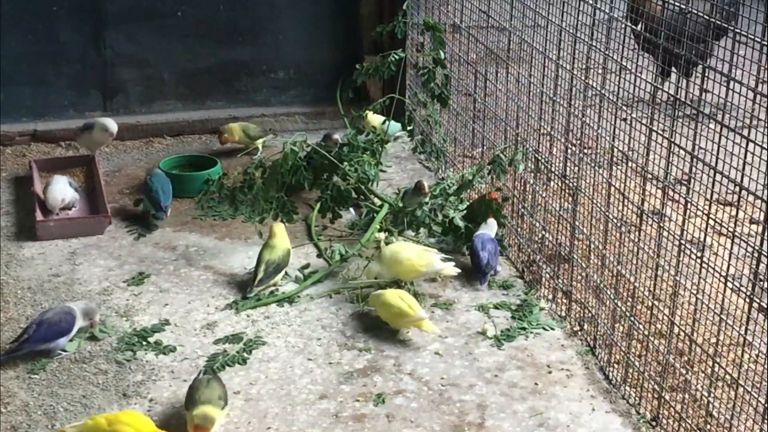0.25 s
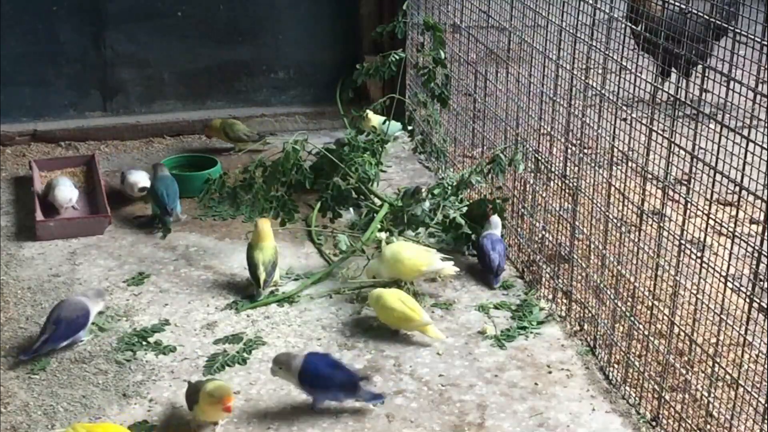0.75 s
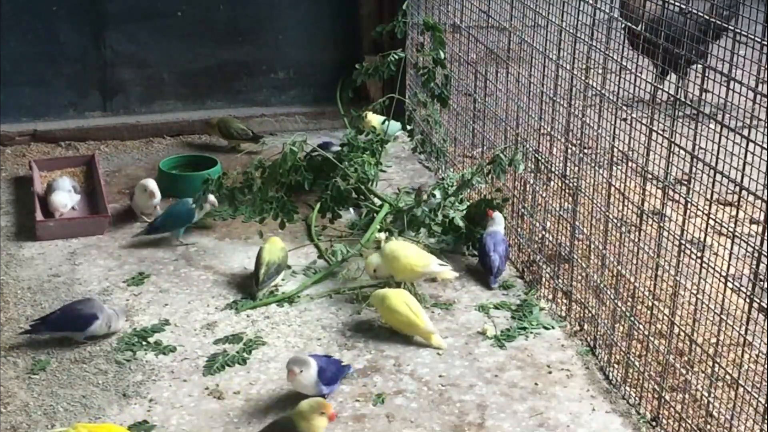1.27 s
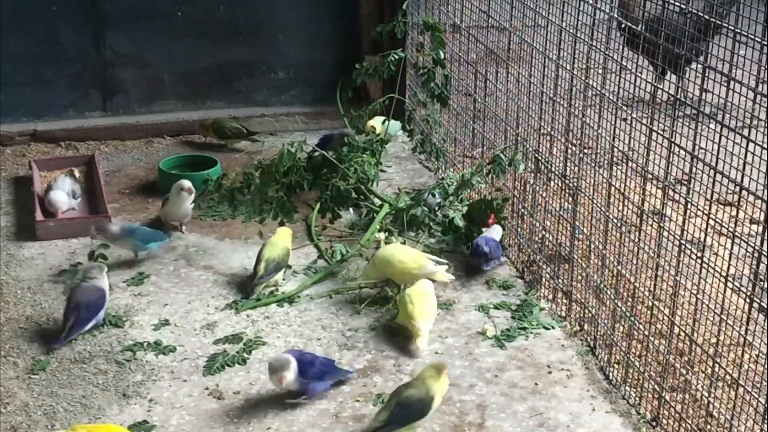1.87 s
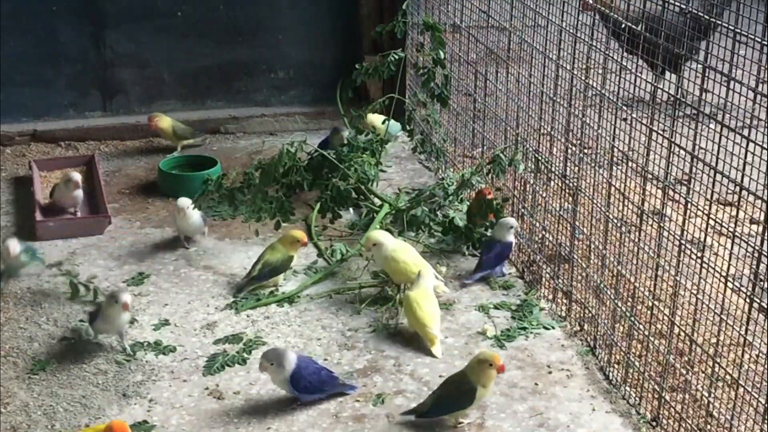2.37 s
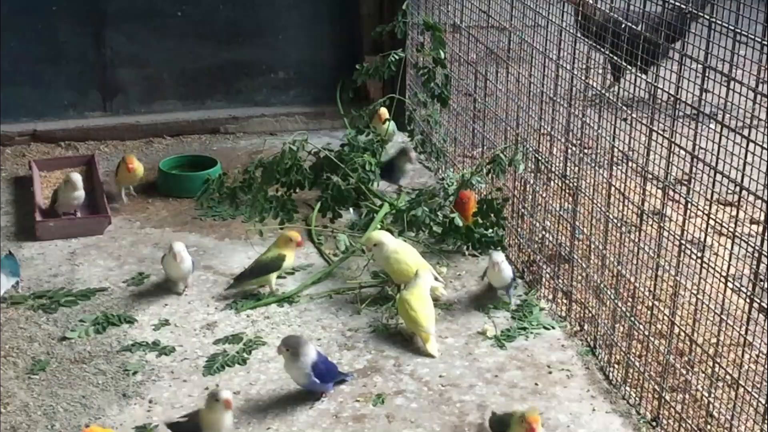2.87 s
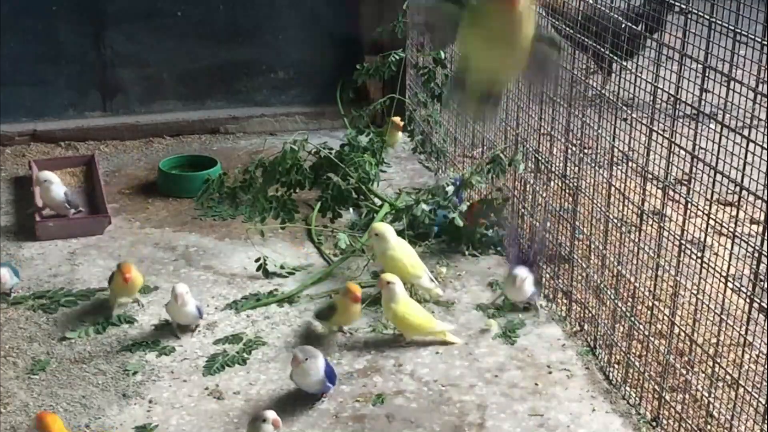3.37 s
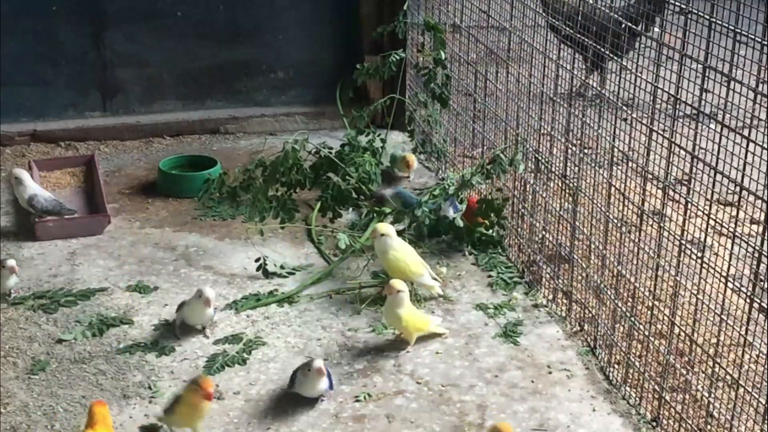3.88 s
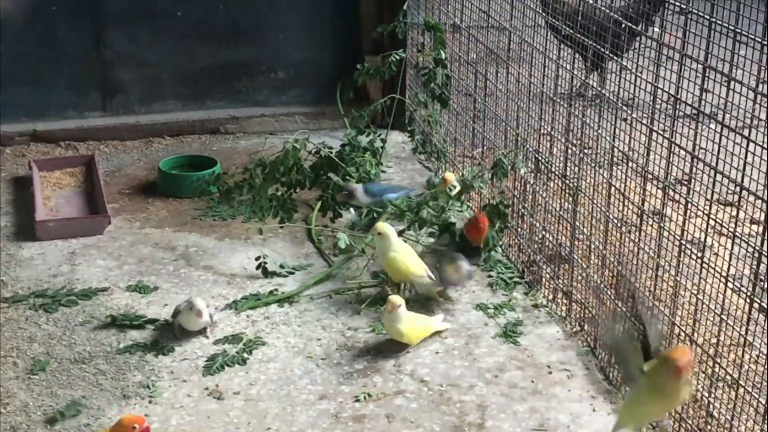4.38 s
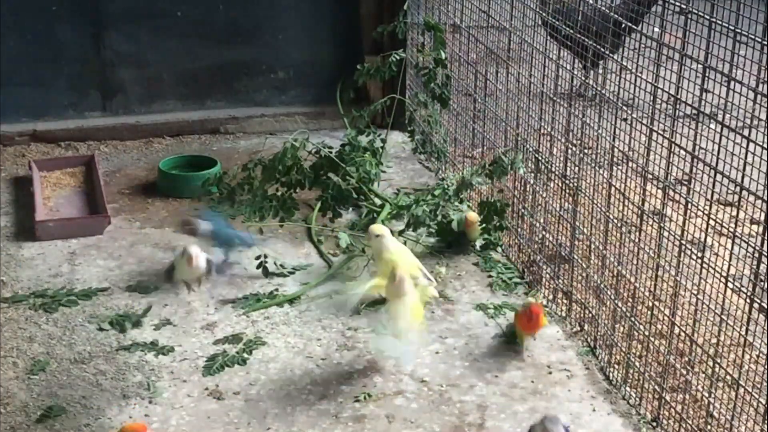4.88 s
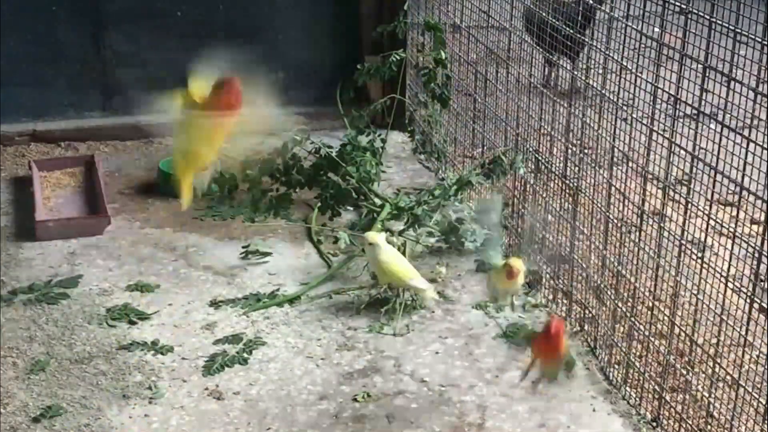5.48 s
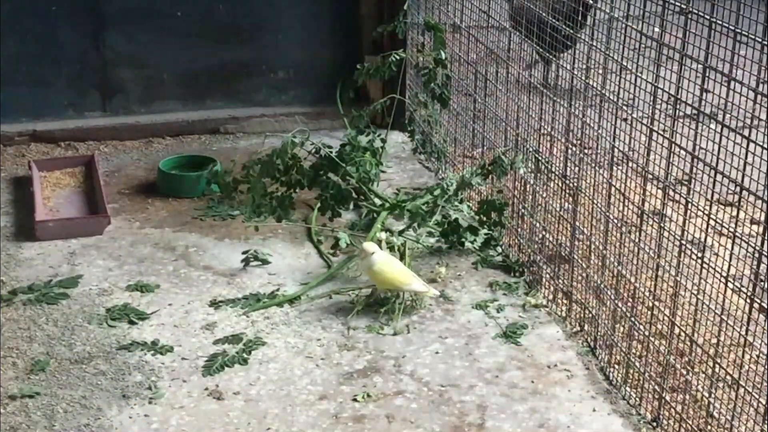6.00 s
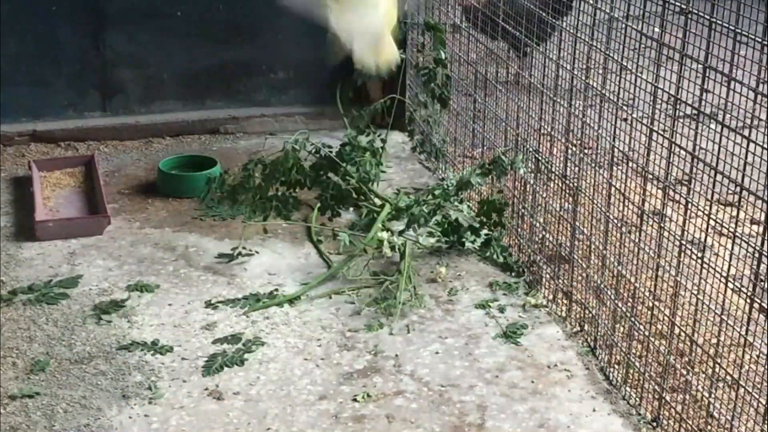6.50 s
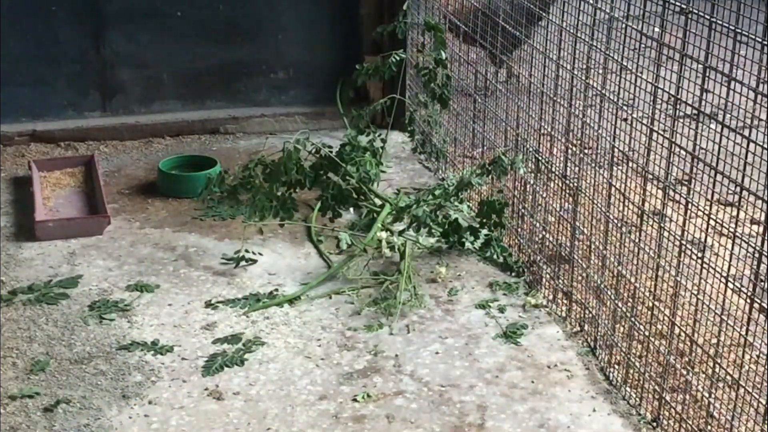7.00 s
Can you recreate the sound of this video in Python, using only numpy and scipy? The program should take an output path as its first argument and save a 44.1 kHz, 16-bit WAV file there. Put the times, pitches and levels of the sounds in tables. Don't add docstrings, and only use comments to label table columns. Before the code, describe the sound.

Small parrots squawk sharply, then wings flutter, clap and whoosh past in bursts over wooden knocks, with piercing chirps inside a short-echoing aviary.

```python
import sys
import numpy as np
from scipy import signal
from scipy.fft import rfft, irfft, next_fast_len
from scipy.io import wavfile
from scipy.ndimage import uniform_filter1d

SR = 44100
rng = np.random.default_rng(int(sys.argv[2]) if len(sys.argv) > 2 else 0)


def pcm_store(signal):
    levels = np.round(np.clip(np.atleast_2d(signal), -1, 1) * 32767)
    wavfile.write(sys.argv[1], SR, levels.astype(np.int16).T)


def how_loud(loudness_db):
    steps = np.asarray(loudness_db, float) / 20
    return 10 ** steps


N = 319725
EDGES_HZ = 25 * 2 ** np.arange(0, 9.4, 1 / 3)
MIDS_HZ = np.sqrt(EDGES_HZ[1:] * EDGES_HZ[:-1])


def rms_one(x):
    return x / np.sqrt(np.mean(x ** 2) + 1e-20)


def evened(x):
    return x / np.sqrt(uniform_filter1d(x ** 2, size=SR // 8) + 1e-20)


def at_hz(points, hz):
    points_hz, points_db = np.transpose(points)
    return np.interp(np.log(hz), np.log(points_hz), points_db)


def filled(slow):
    return np.interp(np.arange(N) / 40, np.arange(len(slow)), slow)


def drift(rate_hz, coarse=False):
    r = np.exp(-80 * np.pi * rate_hz / SR)
    wander = signal.lfilter([1], [1, -2 * r, r * r], rng.standard_normal(N // 40 + 1002))
    slow = rms_one(wander[1000:])
    return slow if coarse else filled(slow)


def noise_bank():
    white = rng.standard_normal((2, N))
    bands = []
    for k, edges in enumerate(zip(EDGES_HZ, EDGES_HZ[1:])):
        band = signal.butter(2, edges, "band", fs=SR, output="sos")
        bands.append(signal.sosfilt(band, white[k % 2]))
    return np.array(bands)


def resonance(x, hz, width_hz):
    r = np.exp(-np.pi * width_hz / SR)
    top = np.array([1, 0, -1]) * (1 - r * r) / 2
    return signal.lfilter(top, [1, -2 * r * np.cos(2 * np.pi * hz / SR), r * r], x)


# pitch_hz, width_hz, level_db
WOOD_NOTES = [(280, 68, 2.5), (383.4, 51.7, 6.5), (420, 39, -0.5), (615.7, 35, 4), (694.6, 44, 2.5),
              (855, 40, 3.5), (974, 94, -7.5), (1090, 18, 9), (1102, 56, -4), (1500, 29, -10.5),
              (1700, 44, -19)]


def woodwork(x):
    return sum((-1) ** k * how_loud(db) * resonance(x, hz, width) for k, (hz, width, db) in enumerate(WOOD_NOTES))


# time_s, wing_effort_db, nearness_db
FLOCK = [(0, -8.5, 9.5), (.2, -13.5, 0), (1, -15, -3.5), (1.9, -13, -6.5), (2.1, 4.5, -15),
         (2.35, -20.5, 3), (2.648, 6, -12), (3, -10, -2), (3.3, 6.5, 0), (3.85, 3, 2.5), (4.26, 5, 4),
         (4.64, 5, 2.5), (5.05, 6, 0.5), (5.7, 4, 6), (6, 3, 2.5), (6.7, -4.5, 3), (6.9, 4.5, 4.5),
         (7.25, -9, 2)]


def flock(level_db, effort_share, near_share):
    s, effort_db, near_db = np.transpose(FLOCK)
    return np.interp(np.arange(N) / SR, s, level_db + effort_share * effort_db + near_share * near_db)


# peak_s, deep_gust_db, hollow_boom_db, length_s
PASSES = [(0.087, -45, -37.5, 0.11), (0.897, -49, -57.5, 1.24), (0.455, -57, -44, 0.2),
          (1.521, -46, -49, 0.83), (2.013, -58.5, -36.5, 0.25), (2.26, -41.5, -33, 0.39),
          (2.668, -39.5, -40.5, 1.1), (3.288, -35.5, -41, 0.36), (3.657, -32.5, -30.5, 0.19),
          (3.864, -31, -49, 0.29), (4.045, -29, -34, 0.31), (4.267, -46, -21, 0.2),
          (4.417, -31.5, -40.5, 0.31), (5.005, -29.5, -37.5, 0.64), (5.764, -27, -35.5, 0.32),
          (6.403, -37.5, -44.5, 0.47), (6.976, -37.5, -40.5, 0.88)]


def passing(flock_db, column):
    rise_share, depth_db = 0.47, 23.5
    t = np.arange(0, N, 64) / SR
    power = how_loud(2 * flock_db[::64])
    for row in PASSES:
        lead = (row[0] - t) / row[3]
        away = np.maximum(lead / rise_share, -lead / (1 - rise_share))
        power = power + how_loud(2 * (row[column] - depth_db * away ** 2))
    return np.interp(np.arange(N) / SR, t, 10 * np.log10(power))


def turbulence(bank, colour, patchy_db, beat_db):
    wingbeat_hz = 16 * (1 + .3 * drift(3.115, True))
    beat = np.sin(2 * np.pi * np.cumsum(wingbeat_hz) * 40 / SR) * drift(3.8, True)
    air = np.zeros(N)
    for band, hz in zip(bank, MIDS_HZ):
        if colour[0][0] < hz < colour[-1][0]:
            level_db = at_hz(colour, hz) + patchy_db * drift(18.6, True) + beat_db * beat
            air += filled(how_loud(level_db)) * band
    return rms_one(air)


# pitch_hz, level_db (per Hz)
DOWNWASH_COLOUR = [(15, -39), (25, -7), (54, 3), (105, 3.5), (140, -8), (230, -120)]
# pitch_hz, width_hz, level_db
PEN_BOOM = [(118, 14, -7), (144, 11, 0), (168, 20, -9)]


def downwash(bank):
    gust_db = passing(flock(level_db=-42, effort_share=0.37, near_share=0.97), column=1)
    boom_db = passing(flock(level_db=-52.5, effort_share=0.54, near_share=0.073), column=2)
    gust = turbulence(bank, DOWNWASH_COLOUR, patchy_db=-2.0, beat_db=1.0)
    push = rng.standard_normal(N)
    hum = rms_one(resonance(resonance(push, 90, 40), 90, 16))
    boom = np.zeros(N)
    for hz, width, db in PEN_BOOM:
        boom += how_loud(db) * rms_one(resonance(resonance(push, hz, 3 * width), hz, width))
    return how_loud(gust_db) * evened(gust + how_loud(-43.0 - gust_db) * hum) + how_loud(boom_db) * evened(boom)


# pitch_hz, level_db (per Hz)
DRUMMING_COLOUR = [(120, -28.5), (200, 18), (259, -18.5), (424, 3), (531, 6.5), (652, -5.5), (838, -3),
                   (1130, -13.5), (1700, -26), (2210, -49), (3740, -120)]


def drumming(bank):
    drum = turbulence(bank, DRUMMING_COLOUR, patchy_db=5.0, beat_db=3.0)
    level_db = flock(level_db=-44, effort_share=0.95, near_share=.01)
    return how_loud(level_db) * rms_one(woodwork(drum) + 0.64 * drum)


# pitch_hz, level_db (per Hz)
RUSH_COLOUR = [(760, -11), (1300, -3.5), (1510, -8), (3550, -15), (5150, -35), (6000, -32), (7800, -53.5),
               (13200, -120)]


def rush(bank):
    level_db = flock(level_db=-49.5, effort_share=0.96, near_share=0.3)
    return how_loud(level_db) * turbulence(bank, RUSH_COLOUR, patchy_db=3.0, beat_db=1.8)


# pitch_hz, level_db (per Hz)
HISS_COLOUR = [(2940, -17.5), (5000, -3), (6390, -8.5), (7810, -7.5), (10300, -7), (11200, -10),
               (15700, -9.5)]


def hiss(bank):
    level_db = flock(level_db=-58, effort_share=0.46, near_share=0.92)
    return how_loud(level_db) * turbulence(bank, HISS_COLOUR, patchy_db=2.2, beat_db=2.2)


# start_s, length_s, peak_db, first_pitch_hz, last_pitch_hz
SQUAWKS = [(-.01, .03, -21, 6800, 6100), (-.01, .03, -21, 3150, 2900), (-.01, .029, -23, 2400, 1940),
           (.018, .028, -16, 4750, 4600), (.071, .009, -16, 3860, 3850), (.078, .045, -26, 2600, 2250),
           (.084, .019, -11.5, 4060, 3950), (.103, .008, -15, 3900, 3700), (.11, .025, -23, 4700, 4500),
           (.112, .024, -19, 3350, 3050), (.112, .03, -25, 1700, 1500), (.14, .03, -32, 3900, 3700),
           (.16, .035, -31, 1750, 1850), (.171, .017, -16, 3164, 3115), (.181, .035, -27, 2730, 2730),
           (.17, .03, -30, 4300, 4400), (.605, .02, -48, 2336, 2270), (1.41, .07, -57, 1720, 1700),
           (1.43, .08, -57, 1560, 1540), (2.192, .03, -44, 3300, 3300), (2.192, .025, -50, 4800, 4800),
           (2.196, .13, -56, 11900, 11300), (2.313, .051, -57, 10900, 10500), (2.33, .04, -60, 9600, 9500),
           (4.803, .06, -34, 2317, 2374), (4.897, .02, -25, 2300, 2250), (.157, .005, -24, 3800, 3800),
           (3.745, .025, -40, 2800, 2750), (5.478, .015, -40, 3350, 3300), (5.508, .02, -37, 3350, 3300),
           (5.515, .045, -37, 4340, 4470), (7.027, .014, -40, 3300, 3250), (7.092, .045, -43, 3300, 3250),
           (7.095, .015, -47, 5100, 5100)]
# time_s, pitch_hz, level_db
OPENING = (-15, -25, .45, [(0, 4400, -15), (.006, 4700, -9), (.011, 5100, -16), (.016, 4600, -13),
           (.021, 4400, -6), (.025, 4100, -15), (.032, 3850, -16), (.042, 3850, -23)])
RISING = (8, 2, .25, [(5.735, 2080, -23), (5.744, 2350, -15), (5.7485, 2480, -29), (5.752, 2600, -16),
          (5.767, 2720, -16), (5.772, 2700, -28), (5.786, 2720, -24), (5.79, 2700, -38), (5.84, 2650, -42)])
SCREECH = (-30, -6, .95, [(5.771, 6500, -21), (5.777, 6500, -14), (5.785, 6300, -17), (5.795, 6150, -11),
           (5.8, 6150, -20), (5.815, 6150, -22), (5.84, 6100, -32)])
UPSWEEP = (3, -4, .15, [(6.3805, 2980, -28), (6.384, 3080, -17), (6.388, 3200, -15), (6.3895, 3350, -26)])
SQUEAK = (-19, 0, .2,  [(6.3885, 3450, -12), (6.392, 3700, -6), (6.3945, 4000, -15), (6.399, 4600, -1),
          (6.4025, 5100, -14)])
WARBLE = (-36, -6, .1, [(6.407, 6100, -28), (6.411, 6750, -10), (6.415, 6700, -24), (6.419, 6700, 0),
          (6.4215, 6700, -12), (6.424, 6800, 1), (6.4262, 6950, -20), (6.428, 7000, -5),
          (6.4292, 7000, -20), (6.4305, 6400, -1), (6.433, 5250, -7)])
FALLING = (-10, -3, .06, [(6.4325, 5250, -6), (6.4355, 5100, -12), (6.437, 5020, -3), (6.4395, 4950, -11),
           (6.4415, 4800, -1), (6.444, 4500, -7), (6.452, 4350, -11), (6.466, 4330, -20),
           (6.52, 4330, -45)])


def sung_notes():
    peak_share, edge_db = .45, -9
    hoarse = []
    for s, length, db, hz, last_hz in SQUAWKS:
        course = [(s, hz, db + edge_db),
                  (s + peak_share * length, (hz + last_hz) / 2, db),
                  (s + length, last_hz, db + edge_db)]
        hoarse.append((-22, -25, .7, course))
    return hoarse + [OPENING, RISING, SCREECH, UPSWEEP, SQUEAK, WARBLE, FALLING]


# pitch_hz, level_db
BEAK = [(2000, -21), (6500, 3.5), (8000, 5), (9500, -0.5), (11500, 8.5), (13200, 19), (15500, -16)]


def chirps():
    out, shake_level, shake_pitch = np.zeros(N), drift(480), drift(390)
    breath = rms_one(resonance(rng.standard_normal(N), 5070, 5000))
    for tilt_db, upper_db, rough, course in sung_notes():
        s, *columns = np.transpose(course)
        at = np.arange(int(max(s[0], 0) * SR), int(s[-1] * SR))
        hz, db = [np.interp(at / SR, s, column) for column in columns]
        shaken_hz = hz + (200 + 0.023 * hz) * rough * shake_pitch[at]
        phase = 2 * np.pi * np.cumsum(shaken_hz) / SR
        overtones = np.zeros(len(at))
        for k in range(3, 7):
            fall_db = np.minimum(tilt_db, tilt_db / 2 - 21 - 0.52 * (k - 2))
            level = how_loud(fall_db + upper_db + at_hz(BEAK, k * hz))
            overtones += level * np.sin(k * phase) * (k * hz < 16000)
        overtones *= 0.91 + 0.9 * shake_pitch[at + 999] + 0.5 * breath[at]
        second = how_loud(tilt_db + at_hz(BEAK, 2 * hz)) * np.sin(2 * phase)
        tone = np.sin(phase) + second + overtones
        ends = np.clip(np.minimum(at - at[0] + 1, at[-1] - at) / (0.00048 * SR), 0, 1)
        shaken = (1 + rough * np.clip(shake_level[at], -2, 2)) * tone
        out[at] += how_loud(db - 3.5) * ends * (shaken + 0.07 * rough * breath[at])
    return out


def bursts(bank, starts, peak_db, colours_db, t60, rise_s, uneven_db):
    out, t = np.zeros(N), np.arange(SR // 4) / SR
    uneven = uneven_db * rng.standard_normal((len(starts), len(bank)))
    for s, db, colour, decay, own in zip(starts, peak_db, colours_db, t60, uneven):
        i = int(s * SR)
        age = t[:min(N - i, int(max(decay, .02) * 1.5 * SR))]
        heard = colour > -40
        fall = np.clip(decay, .02, 1) * (MIDS_HZ[heard, None] / 3000) ** -.2
        fade = how_loud(db + colour + own)[heard, None] * np.exp(-np.log(1000) * age[::8] / fall)
        fade = np.repeat(fade, 8, axis=1)[:, :len(age)]
        tail = np.einsum("kn,kn->n", fade, bank[heard, i:i + len(age)])
        crack = 1 + 0.55 * np.exp(-age / 0.014)
        out[i:i + len(age)] += (1 - np.exp(-age / rise_s)) * crack * tail
    return out


# start_s, peak_db, centre_hz, fade_s (by 60 dB)
PUFFS = [(0.001, -15.5, 7000, 0.17), (.002, -25, 12950, 0.18), (.165, -30, 2580, 0.19),
         (.09, -31, 7500, .25), (.162, -54, 5000, 0.13), (.39, -50.5, 9000, 0.14), (.45, -48, 10000, 0.096),
         (.585, -49, 10000, 0.11), (.955, -46, 2680, 0.14), (1.455, -51.5, 10000, 0.2),
         (1.8, -50, 2980, 0.16), (2.03, -48, 4200, 0.082), (2.07, -50, 5050, 0.162), (2.25, -44, 6000, 0.1),
         (2.43, -52.5, 9000, .1), (2.625, -45, 2600, 0.12), (2.69, -47, 2370, 0.21),
         (2.955, -43, 1500, 0.12), (3.28, -15.5, 930, 0.23), (3.443, -37, 7000, 0.11),
         (3.488, -33.5, 7150, 0.15), (3.82, -37, 7040, .15), (4.195, -43, 8500, 0.081),
         (4.42, -35.5, 9700, 0.12), (4.455, -43.5, 9000, 0.53), (5.165, -37, 7000, 0.11),
         (5.4, -37, 4800, 0.24), (5.675, -38, 7000, 0.13), (5.985, -43, 10000, 0.084),
         (6.108, -54, 7000, .12), (5.94, -46, 9000, 0.075), (6.386, -25.5, 12500, 0.23),
         (6.39, -22, 8000, .13), (6.42, -40, 13930, .2), (3.05, -36, 2140, 0.71), (5.74, -24, 8000, 0.23),
         (5.82, -26, 4400, 0.35)]


def puffs(bank):
    s, db, hz, t60 = np.transpose(PUFFS)
    colours = [-20.5 * np.log2(MIDS_HZ / centre) ** 2 for centre in hz]
    return bursts(bank, s, db + 3.5, colours, t60, rise_s=.012, uneven_db=1.5)


def quills(x):
    pitches_hz = np.geomspace(1400, 9000, num=30) * (1 + 0.0464 * rng.standard_normal(size=30))
    return sum((-1) ** k * resonance(x, hz, 0.0063 * hz) for k, hz in enumerate(pitches_hz))


# start_s, peak_db, top_db (relative), focus_hz
CLAPS = [(0.417, -33, -32, 2340), (0.523, -47.5, 4, 1770), (0.667, -58, 15, 2480),
         (1.906, -39.5, -13, 3480), (1.949, -22.5, -31, 2170), (2.0622, -31, -34, 1770),
         (2.195, -35.5, -34, 3080), (2.23, -31.5, -25, 1750), (2.6204, -25.5, -37, 1390),
         (2.798, -27, -2.5, 3800), (3.021, -21.5, -14, 2030), (3.097, -23.5, -43, 2100),
         (3.1953, -22, -20, 2550), (3.382, -17.5, -13.5, 1980), (3.48, -27, -13, 3340),
         (3.553, -22.5, -18, 2070), (3.599, -20.5, 7.5, 3340), (4.0038, -9.5, -9, 2820),
         (4.162, -14, -3, 1820), (4.353, -12.5, -91, 2120), (4.81, -19, -43, 2180), (4.828, -25, 4, 2140),
         (4.992, -14.5, -7, 6460), (5.335, -23, -10.5, 5240), (5.4986, -33, -4, 3500),
         (5.7266, -18, -4, 2530), (6.7284, -43, 12, 2720), (6.806, -44.5, 15, 3900),
         (6.921, -32, -18, 2490)]
# start_s, peak_db, body_db (relative), top_db (relative)
PUSHES = [(0.6081, -40, 9, -46), (1.2024, -38.5, 5.5, -18), (2.53, -25, 1, -11), (2.7013, -31.5, 14, -57),
          (3.263, -22, -9, -25.5), (3.324, -24, 3, -22), (3.7, -35.5, 17, -13), (3.976, -38, 15, 8),
          (4.2052, -19.5, 2, -17), (4.7711, -45, -6, 8), (4.896, -17, 0, -6), (4.93, -48, 33, -10.5),
          (4.981, -23, -14, 1.5), (5.441, -46, -10.5, 5), (5.934, -36, 8, -13), (6.132, -37.5, 13.5, -13),
          (6.185, -37, 10, -29), (6.5786, -39, 9, -51), (6.75, -41, 14, -16), (6.861, -25.5, 5, -13),
          (6.8924, -37, 14, -25), (6.975, -46, 9, -20.5), (7.076, -31.5, 8, -19)]


def claps(bank):
    strokes = [(s, db, -5.5, top, hz, 0.2) for s, db, top, hz in CLAPS]
    strokes += [(*row, 2100, 0.15) for row in PUSHES]
    s, db, bodies, tops, focus_hz, t60 = np.transpose(strokes)
    colours = []
    for body, top, hz in zip(bodies, tops, focus_hz):
        broad = [(150, body - 15), (800, body + 5), (1800, -2.5),
                 (5000, 0.28 * top), (10000, top - 3), (16000, top - 19)]
        focus = 10 * np.exp(-(np.log2(MIDS_HZ / hz) / .35) ** 2)
        colours.append(at_hz(broad, MIDS_HZ) - 4 + focus)
    crackle = how_loud(1.22 * drift(160))
    slaps = crackle * bursts(bank, s - .002, db - 0.5, colours, t60, rise_s=0.0035, uneven_db=2.0)
    return slaps + quills(slaps)


# start_s, peak_db, centre_hz, fade_s (by 60 dB)
THUDS = [(0.438, -41, 640, 0.36), (0.584, -38.5, 650, 0.29), (0.957, -23, 827, 0.17),
         (1.269, -25.5, 746, 0.144), (1.419, -25.5, 705, 0.079), (1.797, -30, 835, 0.31),
         (1.935, -31.5, 420, 0.29), (2.018, -25, 430, 0.094), (2.112, -33, 590, 0.97),
         (2.643, -29, 590, 0.31), (2.686, -25.5, 810, 0.25), (2.832, -16.5, 770, 0.11),
         (2.957, -23.5, 870, 0.41), (3.077, -25, 700, 1), (3.167, -24, 420, 0.043), (3.284, -41, 410, 0.12),
         (3.341, -17, 800, 0.23), (3.6, -14.5, 1090, 0.19), (3.748, -13.5, 770, 0.15),
         (3.893, -15.5, 676, 0.083), (4.039, -23.5, 1090, 0.92), (4.081, -28, 1140, 0.097),
         (4.715, -23, 1230, 0.041), (5.038, -23.5, 563, 0.35), (5.098, -25.5, 620, 0.29),
         (5.708, -12, 1240, 0.045), (5.761, -14.5, 1080, 0.04), (5.805, -13, 1080, 0.054),
         (5.855, -7, 1030, 0.041)]


def thuds(bank):
    s, db, hz, t60 = np.transpose(THUDS)
    colours = [np.where(MIDS_HZ > c, -11, -6) * np.log2(MIDS_HZ / c) ** 2 for c in hz]
    knocks = bursts(bank, s - .01, db + 8.5, colours, t60, rise_s=0.0089, uneven_db=2.5)
    return woodwork(knocks) + how_loud(-8.5) * knocks


# start_s, peak_db, pitch_hz, length_s
CLUCKS = [
    (1.385, -37.5, 345.8, 0.082),
    (1.488, -43, 323, 0.035),
    (1.551, -32.5, 304, 0.032),
    (1.672, -29, 301.6, 0.0343),
    (1.781, -35.5, 341.7, 0.054),
]


def hen():
    pulses, waver = np.zeros(N), drift(81)
    for s, db, hz, length in CLUCKS:
        at = np.arange(int(s * SR), int((s + length) * SR))
        age = (at - at[0]) / len(at)
        cycles = np.cumsum(hz * (1.02 - .05 * age + .05 * waver[at])) / SR
        ticks = np.diff(np.floor(cycles), prepend=0)
        pulses[at] = how_loud(db + 30.5 + 2.5 * waver[at + 999]) * np.sin(np.pi * age) ** 0.5 * ticks
    throat = resonance(pulses, 530, 390) + how_loud(4) * resonance(pulses, 1140, 120)
    return woodwork(throat) + how_loud(-29.5) * throat


# start_s, peak_db, pitch_hz
RINGS = [(1.44, -46, 1130.0), (1.817, -34, 810), (1.96, -51, 2450), (2.543, -33.5, 309),
         (2.577, -35.5, 280.0), (2.725, -32.5, 1180.0), (2.807, -42, 3430.0), (2.836, -42, 670.0),
         (2.839, -31.0, 315), (2.844, -35, 906), (3.03, -47, 3780), (3.033, -38, 3430), (3.181, -31, 1148),
         (3.199, -37.5, 4150), (3.209, -37.0, 2450.0), (3.297, -30, 400.0), (3.387, -28.5, 1940.0),
         (3.486, -45, 4200), (3.486, -43, 3060), (3.489, -29.5, 968), (3.614, -32.0, 2010),
         (3.617, -21.5, 1090.0), (3.852, -30, 670), (3.95, -30, 698), (4.011, -32, 4470.0),
         (4.014, -31, 1970), (4.014, -23, 1056), (4.029, -28, 414), (4.098, -32, 2443),
         (4.119, -28.5, 1644), (4.168, -37, 3060), (4.174, -31, 2430), (4.188, -29, 744),
         (4.209, -30, 1955), (4.357, -28, 1820), (4.362, -37, 2960), (4.363, -30, 1110),
         (4.719, -34.0, 1177), (4.836, -42, 4100.0), (4.836, -41, 3390), (4.926, -30, 329),
         (4.995, -35.0, 3190), (4.998, -37, 2930), (4.998, -37, 3480.0), (4.998, -32, 4210),
         (5.011, -31.0, 2530), (5.105, -27.5, 636), (5.515, -39.5, 3270), (5.683, -29.5, 473),
         (6.188, -32.5, 482), (6.865, -34, 1380), (6.872, -38, 2570)]


def rings():
    rise_s, t60_s, lead_s = 0.0033, 0.11, .009
    out, age = np.zeros(N), np.arange(SR // 5) / SR
    shape = (1 - np.exp(-age / rise_s)) ** 2 * how_loud(-60 * age / t60_s)
    for s, db, hz in RINGS:
        i = int((s - lead_s) * SR)
        out[i:i + len(age)] += how_loud(db + 6.0) * shape * np.sin(2 * np.pi * hz * age)
    return out


# start_s, peak_db, centre_hz
TAPS = [(1.9525, -40, 3000), (2.7989, -25, 5000), (3.326, -25.5, 4200), (4.797, -38, 5000),
        (4.833, -23, 9000), (4.8966, -31, 4000), (4.929, -36, 11000), (4.9918, -37, 5000),
        (5.443, -34, 9000), (5.496, -33.5, 10000), (6.806, -34.5, 6000), (6.8577, -18.5, 2500),
        (6.866, -27, 3500), (6.8936, -23, 1800), (6.921, -24, 2800), (6.976, -40, 3000)]


def taps(bank):
    s, db, hz = np.transpose(TAPS)
    colours = [-5.5 * np.log2(MIDS_HZ / centre) ** 2 for centre in hz]
    t60 = np.full(len(s), 0.0266)
    cracks = bursts(bank, s - .0005, db - 2.0, colours, t60, rise_s=0.00051, uneven_db=1.0)
    clicks = np.full(N, 1e-18)
    clicks[(s * SR).astype(int)] = how_loud(db + 9)
    return cracks + resonance(clicks, 3000, 4000)


# start_s, peak_db
WIRE_HITS = [
    (4.8314, -30),
    (4.9838, -29),
    (5.021, -36.5),
    (5.3393, -31),
    (5.4824, -45),
]


def wire():
    shake, t = np.zeros(N), np.arange(int(.15 * SR)) / SR
    t60_s = .2
    for s, db in WIRE_HITS:
        i = int(s * SR)
        shake[i:i + len(t)] += how_loud(db + 17.0 - 60 * t / t60_s)
    return resonance(shake * rng.standard_normal(N), 14880, 120)


def pen(x):
    t60_s, wall_cut_hz = 0.2, 8300
    size = next_fast_len(N + SR)
    w = 2 * np.pi * np.arange(size // 2 + 1) / size
    dull = 1 / (1 + 1j * w * SR / (2 * np.pi * wall_cut_hz))
    echo = 0
    for k, lag_s in enumerate(rng.uniform(.004, .028, size=10)):
        loop = how_loud(-60 * lag_s / t60_s) * dull * np.exp(-1j * w * lag_s * SR)
        echo = echo + (-1) ** k * loop / (1 - loop)
    return irfft(rfft(x, size) * echo, size)[:N]


def scene():
    air_bank, strokes_bank = noise_bank(), noise_bank()
    air = downwash(air_bank) + drumming(air_bank) + rush(air_bank) + hiss(air_bank)
    voices = chirps() + hen()
    wings = puffs(strokes_bank) + claps(strokes_bank) + thuds(strokes_bank)
    wings += rings() + taps(strokes_bank)
    echo = pen(how_loud(-19) * wings + how_loud(-13.5) * voices)
    return (air + wings + voices + wire() + echo)[None]


def low_pass(x):
    return signal.sosfilt(signal.butter(12, 15890, fs=SR, output="sos"), x)


def record(dry):
    thin = signal.sosfilt(signal.butter(2, 38, "high", fs=SR, output="sos"), dry)
    cut = signal.sosfilt(signal.cheby2(12, 35, 16000, fs=SR, output="sos"), thin)
    return low_pass(cut)


dry = scene()
out = record(dry)
pcm_store(out)
```